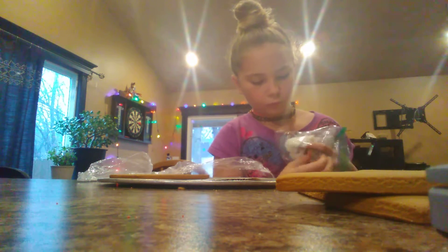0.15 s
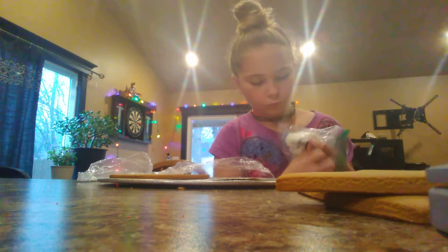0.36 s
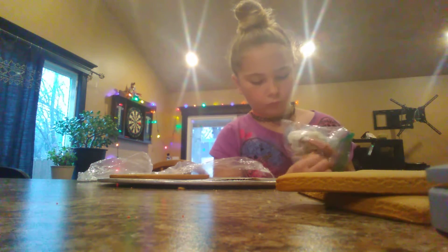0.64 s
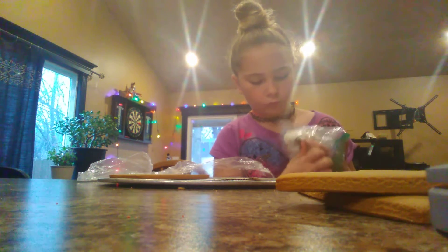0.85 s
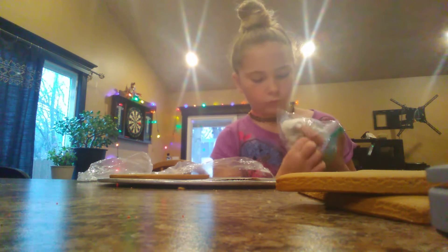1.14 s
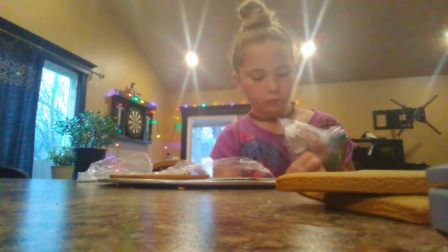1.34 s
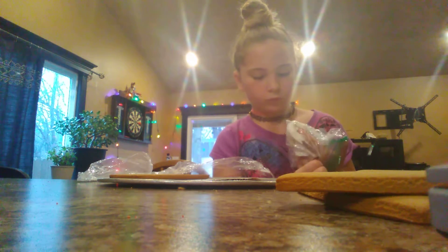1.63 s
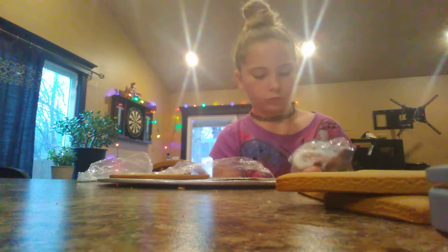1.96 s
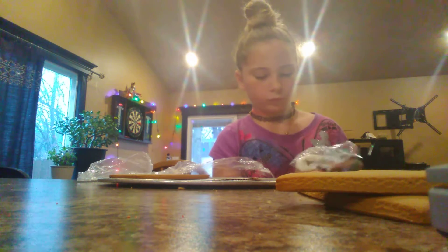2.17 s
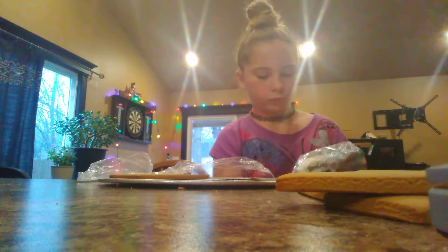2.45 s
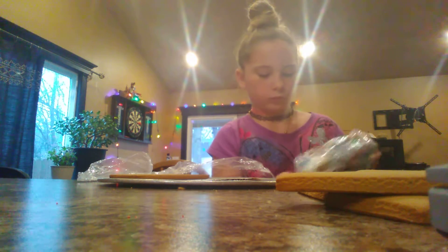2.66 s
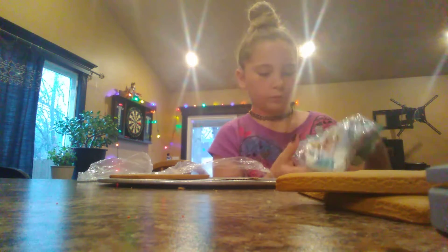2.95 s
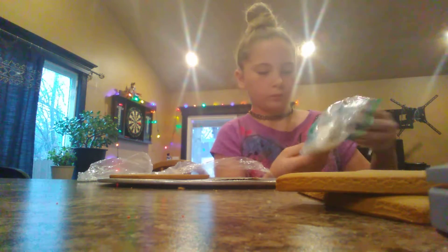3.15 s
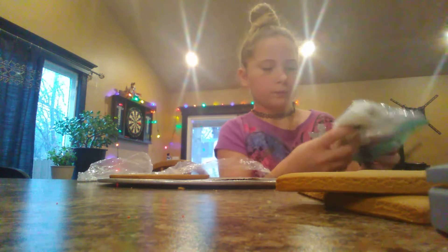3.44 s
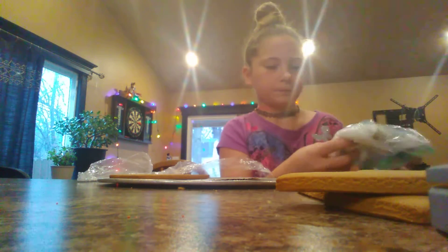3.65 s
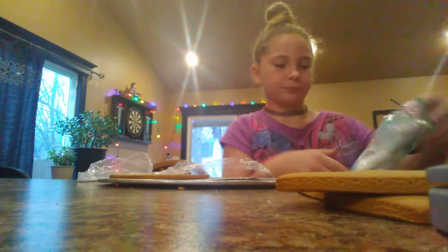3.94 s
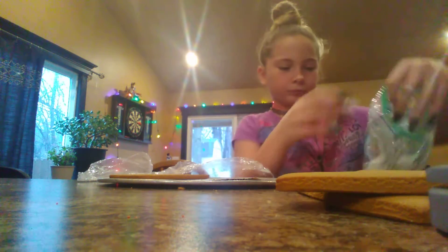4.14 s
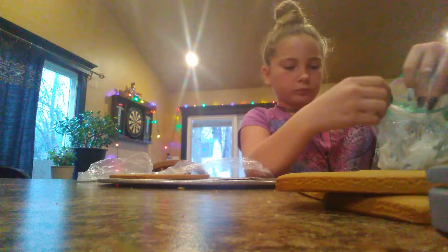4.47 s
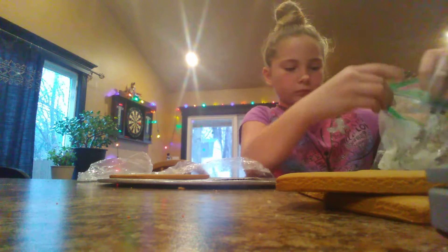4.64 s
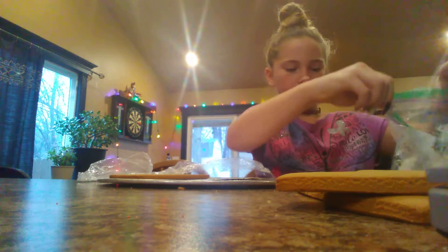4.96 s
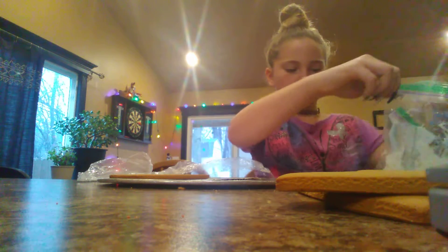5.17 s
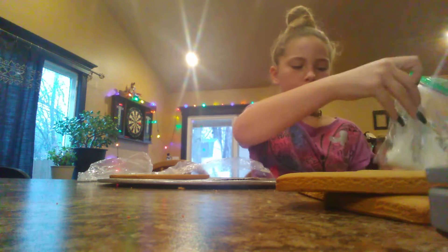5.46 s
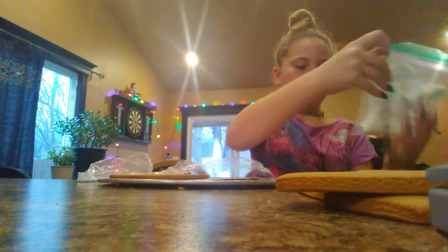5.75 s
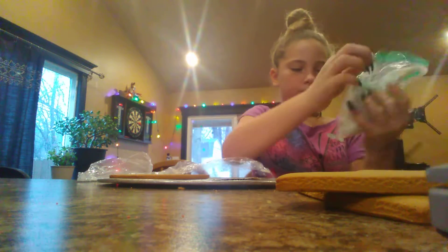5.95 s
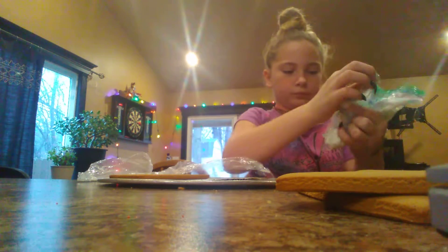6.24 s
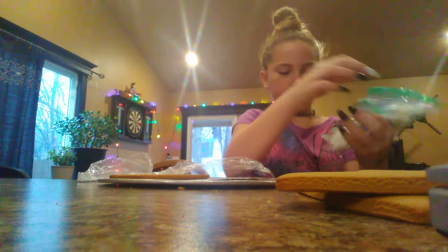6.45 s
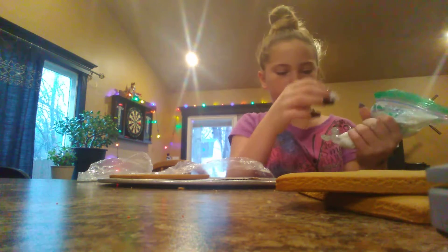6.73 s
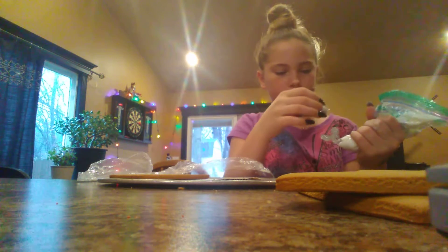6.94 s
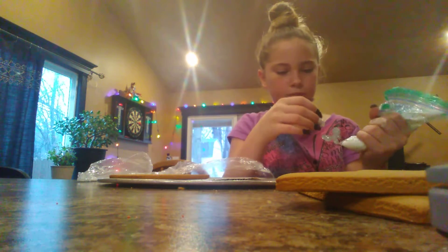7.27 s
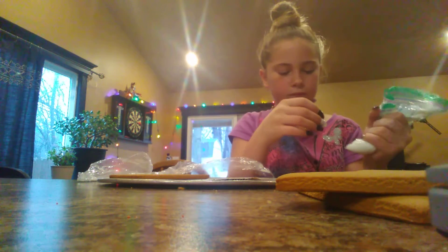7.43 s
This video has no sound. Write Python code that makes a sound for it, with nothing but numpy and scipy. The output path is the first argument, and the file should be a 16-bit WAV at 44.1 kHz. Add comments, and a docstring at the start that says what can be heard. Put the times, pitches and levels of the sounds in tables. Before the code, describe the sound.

A soft-filled plastic bag crinkles at once under kneading fingers, in small irregular bursts. It is then turned over and shaken, with louder rustles, sharp fold snaps, soft low bumps and a short counter groan. One light hard tap follows, then crisp gathering that thins to almost nothing. Close wide stereo in a quiet kitchen with low hum and a short tail.

```python
"""Crisp crinkling at once, over a quiet room hum: a plastic bag of icing is kneaded, turned over and shaken down.
Creases buckle in dense showers of filtered-noise clicks, facets ping as short sines, and folds snap as noise bursts.
The soft filling and arms bump as damped low tones and drag as low noise; stiff plastic is tapped, the counter groans.
A kitchen counter and walls add a short tail; two microphone ports are subtracted from each other for width."""
import sys
import numpy as np
from scipy import signal
from scipy.fft import rfft, irfft
from scipy.io import wavfile
from scipy.ndimage import uniform_filter1d

SR = 44100
rng = np.random.default_rng(int(sys.argv[2]) if len(sys.argv) > 2 else 0)


def store_wav(level_fs):
    """Save 16-bit WAV to argv[1]."""
    pcm = np.round(np.clip(np.atleast_2d(level_fs), -1, 1) * 32767)
    wavfile.write(sys.argv[1], SR, pcm.T.astype(np.int16))


N = 335160
TIME = np.arange(N) / SR
FREQS = np.maximum(np.arange(N // 2 + 1) * SR / N, 1)  # kept above zero for log lookup

# colour of the ventilation rumble: [f/Hz, level/dB]
ROOM_COLOUR = [(25, -16), (50, -7), (75, 2.5), (110, 3.5), (170, 0.5), (250, -3.5), (450, -13.5),
               (800, -13), (1500, -23.5), (3000, -26.5), (7000, -36.5), (13000, -37)]
# appliance hum before its waver: [f/Hz, level/dB]
APPLIANCE_HUM = [(107.7, -67), (246.5, -64), (304, -76.5)]
# squeezes and shifts of grip, before layer trims; the bag is kneaded, turned over from 2.6 s,
# hung by its top from 4.4 s and gathered from 5.8 s:
# [start t/s, length t/s, crinkle level/dB, treble relative to it level/dB]
GRIPS = [(-.02, 0.17, -56.5, 0), (0.302, 0.15, -58.5, 1.5), (0.457, 0.044, -54.5, 5.5),
         (0.523, 0.052, -60, 5), (0.62, 0.077, -56, -2.5), (0.796, 0.082, -60, -2.5),
         (0.978, .125, -54.5, -1), (1.158, .23, -59, -2.5), (1.431, 0.18, -53.5, 4), (1.821, 0.1, -51, 3),
         (1.974, 0.19, -57.5, -1), (2.27, 0.049, -50, -3.5), (2.481, .13, -58.5, 2.5),
         (2.613, 0.11, -49.5, 5), (2.72, 0.34, -52, 0), (3.001, 0.076, -45, -7), (3.097, 0.12, -48.5, 1),
         (3.201, 0.31, -57, 2.5), (3.488, 0.12, -54.5, 0.5), (3.616, 0.16, -47.5, 0),
         (3.814, .12, -49, 2.5), (3.924, 0.084, -45.5, 3), (4.006, 0.12, -47, -5.5),
         (4.177, .13, -54, -1.5), (4.41, 0.11, -50, 5.5), (4.577, .16, -51.5, 2.5), (4.767, 0.26, -59, -2),
         (4.849, 0.0602, -49.5, 0.5), (5.02, 0.034, -44.5, -0.5), (5.105, 0.08, -48, 0.5),
         (5.215, 0.1, -57.5, -20), (5.388, .07, -58.5, -8), (5.535, 0.05, -55, -1),
         (5.599, .11, -62.5, -20), (5.817, .1, -51.5, 0), (5.933, 0.33, -51, 2.5), (6.317, 0.15, -50.5, 5),
         (6.448, 0.06, -49.5, 6.5), (6.539, 0.2, -58.5, 5), (6.749, 0.19, -63.5, 3), (7.51, 0.12, -71, 2.5)]
# faint crinkle of the bag merely held, before layer trims;
# it hangs free near 5.8 s and rests at the end: [t/s, level/dB]
LIGHT_HOLD = [(5.2, -62), (5.79, -69), (5.86, -62.5), (6.85, -62.5), (7.15, -69.5)]
# how loosely the bag hangs, before each layer takes its share: [t/s, slack level/dB]
BAG_SLACK = [(0, -3.5), (.6, -16.5), (1, -3.5), (1.5, -12), (2.1, -5), (3, -1), (3.8, -1.5), (4.2, 4),
             (4.7, 4.5), (5, 3), (5.3, 4.5), (5.55, 0), (5.9, 1.5), (6.4, 0.5), (7, -4.5)]
# the weight of the icing shifts, before the rub trim: [start t/s, length t/s, level/dB]
ICING_SLIDES = [(1.17, 0.026, -54), (2.631, 0.05, -49), (2.857, 0.33, -53), (3.657, 0.4, -52.5),
                (3.98, 0.08, -48), (4.409, 0.046, -46.5), (4.861, 0.027, -46), (5.107, .07, -49.5),
                (5.55, 0.076, -51.5), (7.346, 0.068, -56)]
# a dragging forearm judders and sets the counter groaning: [start t/s, length t/s, level/dB, f/Hz]
COUNTER_GROANS = [(2.78, 0.12, -58, 160), (4.01, 0.165, -51, 141), (3.995, 0.12, -50, 262),
                  (4.42, 0.022, -59, 210), (5.14, 0.042, -63, 270)]
# soft bumps of bag and arms, before the bump trim: [t/s, level/dB, f/Hz]
SOFT_BUMPS = [(.404, -27.5, 680), (2.134, -26.5, 138.3), (2.646, -33, 225.1), (2.835, -23, 201.5),
              (3.057, -25, 170), (3.965, -26, 95), (3.998, -23, 612), (4.147, -29, 142), (4.288, -25, 620),
              (4.344, -31, 597), (4.3735, -32, 683), (4.711, -23, 329.6), (4.876, -24.5, 199.4),
              (5.61, -30, 156.5), (6.492, -23, 239)]
# a light hard tap and its rebounds: [t/s, level/dB]
HARD_TAPS = [(5.5370, -36), (5.5629, -42), (5.569, -47), (5.5766, -45.5)]
# modes of the tapped plastic: [f/Hz, level/dB, 60 dB decay t/s]
PLASTIC_MODES = [(483, 1, 0.013), (780, -2, 0.025), (1260, -4.5, 0.028), (1540, 10.5, 0.0082),
                 (1824, 8.5, 0.016), (2220, -23, .015), (2645, -3, 0.016), (3246, -1, 0.021),
                 (3520, 4, 0.0088), (5470, -8, 0.0065), (6550, -10, 0.0089)]
# single folds snapping through:
# [t/s, body level/dB, crack level/dB, sizzle level/dB, glassy edge level/dB]
FOLD_SNAPS = [(0.009, -50, -48, -52.5, -70), (0.0628, -49, -49, -48, -69.5), (0.1155, -44, -52, -59, -75),
              (0.2627, -51, -55, -54, -75), (0.2799, -48, -57, -71.5, -83.0),
              (0.3027, -64, -73, -53, -68.5), (0.3302, -47.5, -69, -58, -71), (0.3468, -51, -48, -56, -70),
              (0.468, -44.5, -55, -58.5, -75.0), (0.49, -42, -52, -54.5, -58.5),
              (0.4994, -47.5, -57, -63, -67), (0.548, -58, -48, -60.0, -60), (0.5687, -61, -55, -58, -57),
              (0.6353, -48.5, -46.5, -56, -68.0), (0.679, -53.5, -51, -55, -58),
              (0.8259, -46, -51, -64, -73.5), (0.887, -54, -47, -55.5, -73.5), (0.9154, -69, -61, -50, -69),
              (0.9502, -48, -59, -67, -78), (0.9963, -45.5, -50, -52, -54), (1.0605, -54, -52, -71, -68),
              (1.0676, -46, -56, -67, -60), (1.2142, -52, -53.5, -75, -84.0),
              (1.2811, -44.5, -50, -66.0, -79.0), (1.2869, -47, -46, -58, -74),
              (1.3585, -70, -51, -57, -68.5), (1.421, -44.5, -46.5, -56, -55), (1.499, -43, -52, -68, -75),
              (1.5426, -58, -49, -43, -53), (1.5915, -49, -51, -45, -63.5), (1.6865, -50, -59, -61, -76),
              (1.7172, -53, -45.5, -58, -73), (1.8937, -48, -65, -45, -65), (1.9849, -52, -49, -55, -75),
              (2.077, -56, -41, -51, -70), (2.151, -55, -48.5, -55, -65.5), (2.4427, -56, -58, -57, -78),
              (2.619, -45, -47, -54, -62), (2.654, -44, -46, -42, -53), (2.776, -44, -48.5, -48, -73),
              (2.823, -48, -52, -66, -76), (2.839, -44, -50, -63, -74), (2.8763, -49, -47, -65, -74),
              (2.9245, -43, -45, -49, -59), (3.0075, -41.5, -59, -51, -70.5),
              (3.2652, -59, -43, -55, -64.0), (3.307, -55, -54, -52, -61), (3.3766, -58, -53, -65, -71),
              (3.4523, -47, -61, -52, -70), (3.542, -51, -47.5, -49, -61.0), (3.5516, -42.5, -48, -54, -61),
              (3.577, -46.5, -48, -46.5, -51), (3.635, -57, -51, -47, -53), (3.7017, -46, -45, -63, -61),
              (3.7575, -38, -39.5, -53, -71), (3.8634, -48, -45, -70, -69), (3.9419, -41, -39, -51, -65),
              (3.961, -44, -46.0, -59, -68.5), (3.9684, -57, -38, -56.5, -68.5), (4.07, -61, -49, -56, -57),
              (4.0843, -60, -51, -48, -60.0), (4.1105, -53, -45.5, -48, -64), (4.2512, -49, -47, -53, -65),
              (4.2746, -44, -50, -49, -64.5), (4.2889, -49, -62, -60, -76.0), (4.295, -65, -70, -49.0, -68),
              (4.306, -51, -50, -61, -74.0), (4.353, -61, -51, -60, -51.5),
              (4.3742, -41.5, -61.0, -70.5, -70), (4.3999, -43, -44.5, -54, -62),
              (4.427, -45, -39, -49, -51), (4.4482, -55, -38.5, -59, -66.0), (4.507, -59, -52, -47, -51),
              (4.516, -56, -62, -50, -54), (4.5226, -46, -60, -47, -54), (4.5919, -53, -59, -50, -60),
              (4.6277, -44, -46, -47, -55.5), (4.6783, -43, -53, -45, -53), (4.7209, -47, -60, -45, -50),
              (4.8123, -51, -51, -50, -66.5), (4.879, -46, -46, -49.5, -63), (4.9487, -48, -53, -56, -74),
              (5.0162, -46, -54, -58, -67), (5.042, -39.5, -44, -46, -54), (5.17, -46, -56, -46, -54),
              (5.2852, -54, -62, -72, -80), (5.403, -49, -52, -59, -72), (5.4416, -56, -53.5, -59.0, -68),
              (5.495, -51, -61, -72, -78), (5.6516, -70, -57, -50, -65), (5.693, -70, -50.5, -65, -85.0),
              (5.7118, -55, -55, -66, -80), (5.731, -56, -61, -58.5, -64), (5.8381, -66, -50, -63, -69.5),
              (5.847, -52, -49, -52, -67), (5.8881, -66, -45, -51, -73), (5.922, -63, -64, -43, -48),
              (5.9279, -65, -61.0, -50, -46), (5.944, -40.5, -42.5, -57, -65.5),
              (5.9902, -45, -43, -66, -70.5), (6.0648, -69, -62, -45, -47), (6.096, -68, -65, -49, -53),
              (6.125, -46, -47, -44.5, -53.5), (6.1418, -63, -56, -44, -51), (6.186, -53, -42.5, -47, -56),
              (6.2157, -53, -51, -44.5, -57), (6.245, -58, -44, -44.5, -60), (6.3677, -46.5, -41, -47, -51),
              (6.4248, -52, -43, -49.5, -59.5), (6.471, -46.5, -43, -52, -56), (6.5716, -63, -48, -49, -51),
              (6.677, -53.5, -48, -62, -62), (6.7229, -52, -54, -57, -66), (6.7595, -53, -47, -55, -64.5),
              (6.7956, -55, -51, -49, -54), (6.8265, -71, -51, -58, -70),
              (6.8834, -52, -46.5, -50.5, -60.5), (6.9428, -48.0, -47.5, -49, -56),
              (7.0988, -71, -56, -62, -70), (7.3371, -79, -60, -82, -79),
              (7.5196, -70.5, -61.5, -65.5, -64)]
# colour of the crinkling film: [f/Hz, level/dB]
FILM_COLOUR = [(200, -24), (300, -3), (500, 1.5), (740, 1.5), (1050, -5), (1260, 2.5), (1500, -4.5),
               (1950, -8), (2700, -2.5), (4200, -7), (7000, -8), (9500, -13.5), (12000, -20),
               (14000, -26.5)]
# how unlike the two ports hear a sound: [f/Hz, side minus mid level/dB]
PORT_SIDE = [(40, 14), (100, -10), (270, -3.5), (500, -12), (750, -4), (1300, 0.5), (2000, 10), (3000, 4),
             (4200, -1), (8000, 0)]
# lean between the ports before they are subtracted: [f/Hz, left minus right level/dB]
PORT_BALANCE = [(100, -1), (300, -5), (750, -7), (1050, 3.5), (1400, 8), (2500, -11.5), (4500, 0),
                (7000, -4.5), (13000, 1)]
# phase lean before the subtraction: [f/Hz, lead of the left port/rad]
PORT_PHASE = [(380, 0.57), (620, 0.41), (1000, -0.05), (1450, -0.14), (2200, -0.18)]
# share of the opposite port that is subtracted: [f/Hz, level/dB]
CROSSFEED = [(200, -20), (500, -10), (1000, -2.5), (1600, -.5), (2050, -.05), (2400, -.5), (3100, -2.5),
             (4200, -4), (7000, -8), (13000, -14)]

GRIP_ATTACK_S, GRIP_RELEASE_S = .022, .032  # creases load quickly and settle a little more slowly
GRIP_SWELL_DB, GRIP_CREST = 3, .45  # rise to a crest, and where the crest sits as a share of the length
HOLD_TREBLE_DB = -1  # treble of the light hold, relative to its crinkle
CRISP_WAVER_DB = 2.06  # the film tightens and slackens unevenly under the fingers
RUB_DB = -57  # drag at an average grip, before the rub trim
RUB_FOLLOW, RUB_SLACK = 0.26, 0.16  # dB of drag per dB of grip and per dB of slack
CROSSFEED_HZ, TOP_HZ = 2050, 14300  # one period delays the crossfeed; edge of the top cut


def undb(db):
    """Decibels to gain."""
    return np.exp(np.asarray(db) * (np.log(10) / 20))


def unit(x):
    """Scale to rms 1."""
    return x / np.sqrt(np.mean(x ** 2))


def curve(table):
    """A timed table at every sample."""
    return np.interp(TIME, *np.transpose(table))


def gains(points, hz):
    """Gain of a spectrum table at the given frequencies, drawn straight over log frequency."""
    f, db = np.transpose(points)
    return undb(np.interp(np.log(hz), np.log(f), db))


def band(x, lo_hz, hi_hz, order=2):
    """Causal band-pass."""
    edges_hz = [lo_hz, min(hi_hz, .45 * SR)]
    return signal.sosfilt(signal.butter(order, edges_hz, "band", fs=SR, output="sos"), x)


def walk(rate_hz):
    """Random levels held 1 / rate s and slewed twice; spread near 1."""
    k = int(SR / rate_hz)
    steps = np.repeat(rng.standard_normal(N // k + 1), k)
    return 1.3 * uniform_filter1d(uniform_filter1d(steps, k), k)[:N]


def add(out, s, sound):
    """Mix a short two-port sound in at time s."""
    i = max(int(s * SR), 0)
    out[:, i:i + sound.shape[1]] += sound[:, :N - i]


def room_tone(level_db=-58.0, waver_db=1, hum_waver_db=2.0, wander_rad=0.37):
    """Low ventilation rumble is coloured noise; faint hums waver in level and phase."""
    spectrum = rfft(rng.standard_normal((2, N))) * gains(ROOM_COLOUR, FREQS)
    air = unit(irfft(spectrum, N)) * undb(level_db + waver_db * walk(3.67))
    hum = 0
    for hz, db in APPLIANCE_HUM:
        gain = undb(db + hum_waver_db * np.tanh(walk(6)))
        hum = hum + gain * np.sin(2 * np.pi * hz * TIME + wander_rad * walk(5))
    return air + hum


def kitchen(x, t60_s=0.57, treble_t60_s=0.74, wet_db=-11, treble_db=-2, split_hz=2000, count=3):
    """Counter and walls return a decaying tail, longer in the treble, whose echo pattern keeps shifting."""
    t = TIME[:22050]

    def fade(t60):
        decay = np.exp(-np.log(1000) * t / t60) * (1 - np.exp(-t / 0.0027))
        return decay * rng.standard_normal((2, len(t)))

    # wandering weights blend several tails while their total power stays constant
    places = np.array([walk(3) for _ in range(count)])
    places /= np.linalg.norm(places, axis=0)
    echo = 0
    for place in places:
        low = band(fade(t60_s), 73, split_hz, order=1)
        treble = band(fade(treble_t60_s), split_hz, 9800, order=1)
        tail = low + undb(treble_db) * treble
        tail /= np.sqrt(np.sum(tail ** 2) / 2)
        echo = echo + signal.fftconvolve(x * place, tail, axes=1)[:, :N]
    return x + undb(wet_db) * echo


def stroke(start_s, length_s):
    """Envelope of one hand movement: it catches, swells to a crest, eases and dies away."""
    out = np.zeros(N)
    stop_s = start_s + length_s + 10 * GRIP_RELEASE_S
    span = slice(max(int(start_s * SR), 0), int(stop_s * SR))
    since = TIME[span] - start_s
    rise = np.clip(since / GRIP_ATTACK_S, 0, 1)
    swell = np.interp(since / length_s, [0, GRIP_CREST, 1], [-.5, .5, -.5])
    release = np.exp(-np.maximum(since - length_s, 0) / GRIP_RELEASE_S)
    out[span] = rise * undb(GRIP_SWELL_DB * swell) * release
    return out


def hands():
    """Effort of the hands and crispness of the film in dB: grip powers add up over the light hold."""
    power = undb(curve(LIGHT_HOLD)) ** 2
    treble = power * undb(HOLD_TREBLE_DB) ** 2
    for start_s, length_s, db, treble_db in GRIPS:
        grip = (undb(db) * stroke(start_s, length_s)) ** 2
        power = power + grip
        treble = treble + grip * undb(treble_db) ** 2
    crisp_db = 10 * np.log10(treble / power) + CRISP_WAVER_DB * walk(24.774)
    return 10 * np.log10(power), crisp_db


def crispness(hz):
    """Share of the film's tautness that shows at a frequency: taut film is crisper than slack film."""
    return np.interp(np.log(hz), np.log([1100, 5000, 13000]), [0, 1, .75])


def rub(effort_db, trim_db=-3, uneven_db=-1.0):
    """The icing's weight drags the bag over skin and cloth: uneven low noise, more with grip, slack or shifts."""
    drag = band(rng.standard_normal((2, N)), 123, 329) * undb(uneven_db * walk(60))
    follow_db = RUB_FOLLOW * (effort_db - effort_db.mean())
    power = undb(RUB_DB + follow_db + RUB_SLACK * curve(BAG_SLACK)) ** 2
    for start_s, length_s, db in ICING_SLIDES:
        power = power + (undb(db) * stroke(start_s, length_s)) ** 2
    return unit(drag) * np.sqrt(power) * undb(trim_db)


def groans(width_hz=14):
    """Stick and slip sounds one low tone, wandering in pitch and level, for the length of a drag."""
    drags = 0
    for start_s, length_s, db, hz in COUNTER_GROANS:
        turns = np.cumsum(hz + width_hz * walk(90)) / SR
        drags = drags + undb(db) * stroke(start_s, length_s) * np.sin(2 * np.pi * turns)
    return drags * undb(2 * walk(70))


def bumps(decay_s=0.0035, thud_db=-5, trim_db=-2):
    """A soft push rings one heavily damped low mode over a dull noise thud."""
    out, t = np.zeros((2, N)), TIME[:6000]
    shape = (1 - np.exp(-t / 0.0089)) * np.exp(-t / decay_s)
    for s, db, hz in SOFT_BUMPS:
        thud = unit(band(rng.standard_normal((2, len(t))), hz / 2, 2 * hz))
        body = np.sin(2 * np.pi * hz * t) + undb(thud_db) * thud
        add(out, s, undb(db + trim_db) * shape * body)
    return out


def taps(contact_s=0.0017, port_turns=0.16):
    """A brief contact tick rings stiff plastic; the two ports hear its modes slightly out of step."""
    out, t = np.zeros((2, N)), TIME[:2048]
    for s, db in HARD_TAPS:
        ring = 0
        for hz, mode_db, t60 in PLASTIC_MODES:
            phase = port_turns * rng.standard_normal((2, 1))
            decay = undb(mode_db) * np.exp(-np.log(1000) * t / t60)
            ring = ring + decay * np.sin(2 * np.pi * (hz * t + phase))
        tick = band(rng.standard_normal((2, len(t))) * np.exp(-t / contact_s), 600, 8100)
        add(out, s, undb(db) * (ring * (1 - np.exp(-t / 0.00019)) + tick))
    return out


def snaps(rise_s=0.00074, crack_s=0.00097, tail_s=0.015, tail_db=-24):
    """A fold flips over: a sharp crack and a short flutter of film; tight folds have a glassy edge."""
    out, t = np.zeros((2, N)), TIME[:2048]
    decay = np.exp(-t / crack_s) + undb(tail_db) * np.exp(-t / tail_s)
    shape = (1 - np.exp(-t / rise_s)) ** 2 * decay
    rows, sounds = np.array(FOLD_SNAPS), 0
    bursts = shape * rng.standard_normal((len(rows), 2, len(t)))
    ranges_hz = [(458, 1850), (1700, 3850), (5420, 8640), (9100, 12800)]  # body, crack, sizzle, edge
    for (lo, hi), db in zip(ranges_hz, rows[:, 1:].T):
        part = band(bursts, lo, hi, order=3)
        # level is set as if all the energy fell within 5 ms
        power = np.sum(part ** 2, axis=2, keepdims=True) / (.005 * SR)
        sounds = sounds + part * undb(db)[:, None, None] / np.sqrt(power)
    for s, sound in zip(rows[:, 0], sounds):
        add(out, s, sound)
    return out


def facets(effort_db, crisp_db, count=2600, ring_s=0.0012, spread_db=3, trim_db=4):
    """Small flat facets flip, each with a brief ping at its own pitch; wide ones knock low and ring longer."""
    out, t = np.zeros((2, N)), TIME[:512]
    when, size, pitch, left, right = rng.random((count, 5)).T
    at = (when * N).astype(int)
    hz = 480 * 29 ** pitch ** .85
    size_db = spread_db * np.minimum(-np.log(1 - size), 2)
    db = effort_db[at] + crispness(hz) * crisp_db[at] + size_db
    strength = undb(db + trim_db) * gains(FILM_COLOUR, hz) * np.sqrt(hz / 1000)
    decay = np.exp(-np.outer((hz / 3000) ** 0.38 / ring_s, t))
    shapes = (1 - np.exp(-t / 0.00033)) * decay
    # each port hears the ping at its own random phase
    turns = np.outer(hz, t) + np.array([left, right])[:, :, None]
    pings = strength[:, None] * shapes * np.sin(2 * np.pi * turns)
    for s, ping in zip(TIME[at], pings.swapaxes(0, 1)):
        add(out, s, ping)
    return out


def buckles(effort_db, per_s, spread_db):
    """Energy of random crease clicks: more when the hands work harder, most tiny, a few large."""
    rate = per_s * undb(.75 * (effort_db - effort_db.mean()))
    size = np.minimum(rng.exponential(size=N), 3.8)
    energy = (rng.random(N) < rate / SR) * undb(spread_db * size) ** 2
    # a large buckle relieves the strain that its neighbours would have released
    return energy / (uniform_filter1d(energy, size=1700) + 1e-4)


def crinkle(effort_db, crisp_db, per_s=480, spread_db=1.0, patchy_db=3.5, ring_s=0.0026,
            facet_db=2.0, slide_db=-16, trim_db=-1.78):
    """Each click rings the film briefly in its own colour; film sliding on film hisses between them."""
    slack_db = curve(BAG_SLACK)
    energy = buckles(effort_db, per_s, spread_db)
    hit = np.flatnonzero(energy)
    edges_hz = np.geomspace(250, 15500, 19)
    out, grit = np.zeros((2, N)), rng.standard_normal((2, N))
    for lo, hi in zip(edges_hz, edges_hz[1:]):
        hz, clicks = np.sqrt(lo * hi), np.zeros(N)
        # every click has its own balance of bands
        patches = unit(undb(patchy_db * rng.standard_normal(len(hit))))
        clicks[hit] = energy[hit] * patches ** 2
        # low bands ring very slightly longer
        keep = np.exp(-1 / (SR * ring_s * (3000 / hz) ** 0.014))
        # a buckle takes about half a millisecond to run along its crease
        push = uniform_filter1d(clicks + undb(slide_db) ** 2, size=24)
        ringing = signal.lfilter([1 - keep], [1, -keep], push)
        grains = band(np.sqrt(ringing) * grit, lo, hi, order=3)
        # a loose bag flaps lower and its free sheet rattles; a pinched one moves its body to the midrange
        looseness = np.interp(hz, [450, 850, 1400, 2400, 3600, 5500], [.65, 0, -.4, .35, .3, 0])
        # facets change size as the bag deforms, so its resonances come and go
        facets_db = facet_db * walk(21.926)
        band_db = effort_db + crispness(hz) * crisp_db + looseness * slack_db + facets_db
        out += grains * undb(band_db)
    colour = gains(FILM_COLOUR, FREQS)
    colour /= np.sqrt(np.mean(colour ** 2) / 2)
    return irfft(rfft(out) * colour, N) * undb(trim_db)


def scene():
    """The bag in the kitchen, as it reaches the two ports."""
    effort_db, crisp_db = hands()
    film = crinkle(effort_db, crisp_db) + facets(effort_db, crisp_db) + snaps()
    handling = taps() + bumps() + groans() + rub(effort_db)
    return kitchen(film + handling) + room_tone()


def record(dry):
    """Ports differ in width, level and phase; each loses a delayed share of the other; the top is cut."""
    left, right = rfft(dry)
    width = gains(PORT_SIDE, FREQS)
    mid, side = (left + right) / 2, width * (left - right) / 2
    # half of each lean goes to either port
    lean = np.sqrt(gains(PORT_BALANCE, FREQS))
    lean = lean * np.exp(.5j * np.interp(FREQS, *np.transpose(PORT_PHASE)))
    ports = np.array([(mid + side) * lean, (mid - side) / lean])
    ports = ports / np.sqrt((1 + width ** 2) / 2)
    share = np.minimum(gains(CROSSFEED, FREQS), 1)
    delay = np.exp(-2j * np.pi * FREQS / CROSSFEED_HZ)
    crossed = ports - share * delay * ports[::-1]
    wide = irfft(crossed / np.sqrt(1 + share ** 2), N)
    return signal.sosfilt(signal.ellip(10, .2, 70, TOP_HZ, fs=SR, output="sos"), wide)


dry = scene()
out = record(dry)
store_wav(out)
```